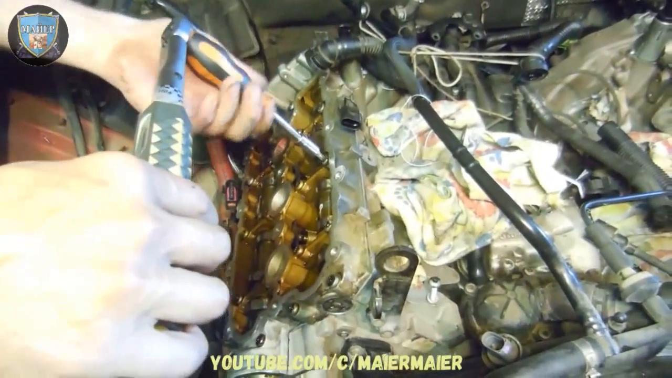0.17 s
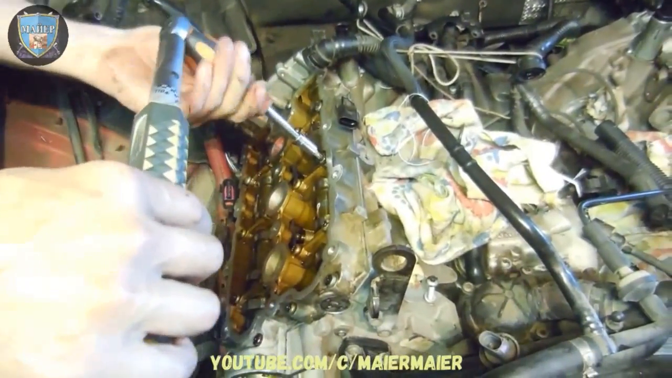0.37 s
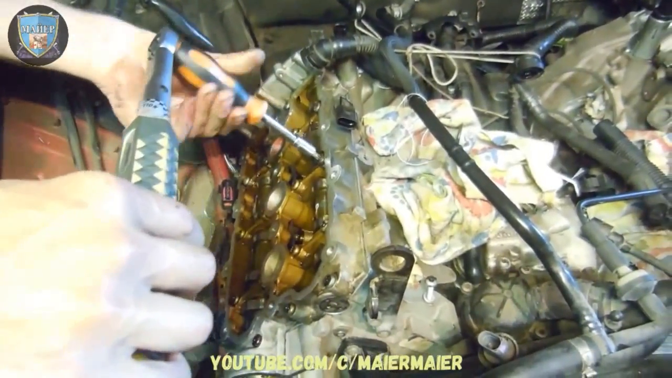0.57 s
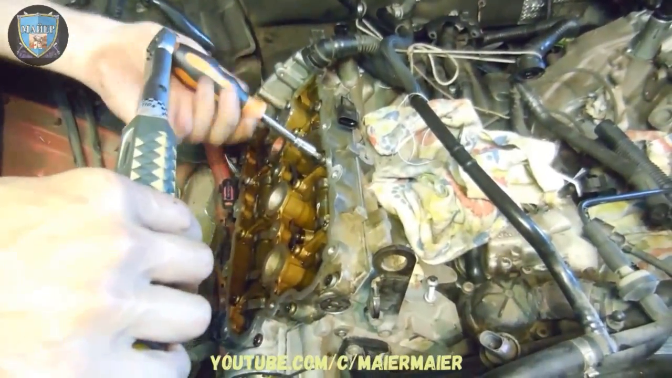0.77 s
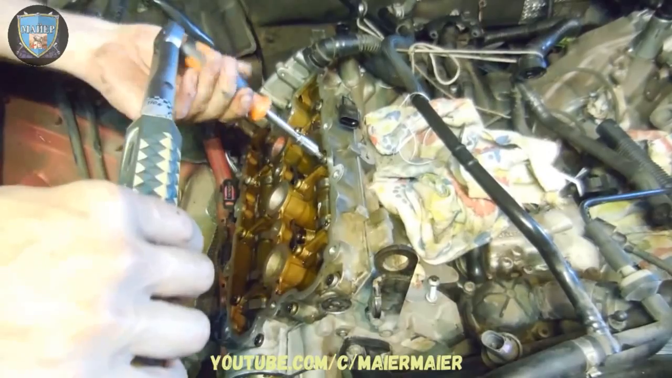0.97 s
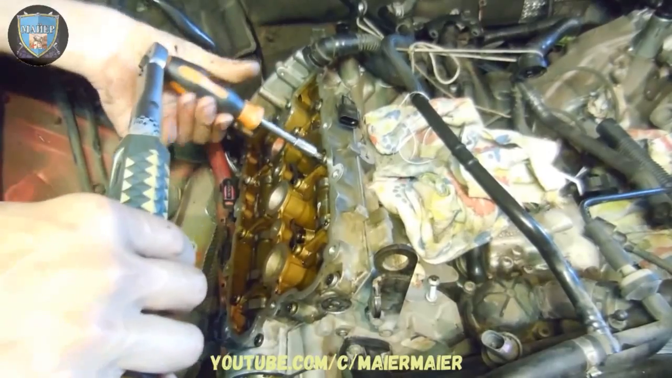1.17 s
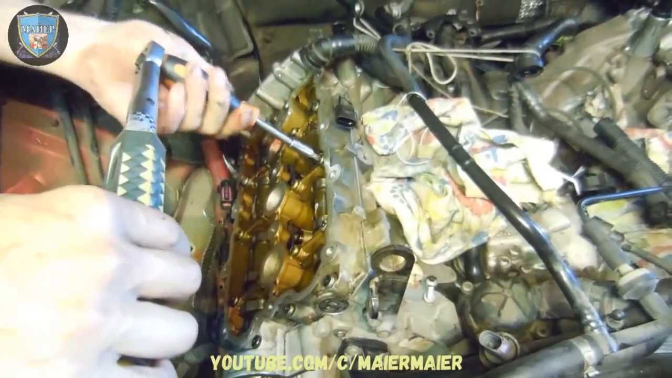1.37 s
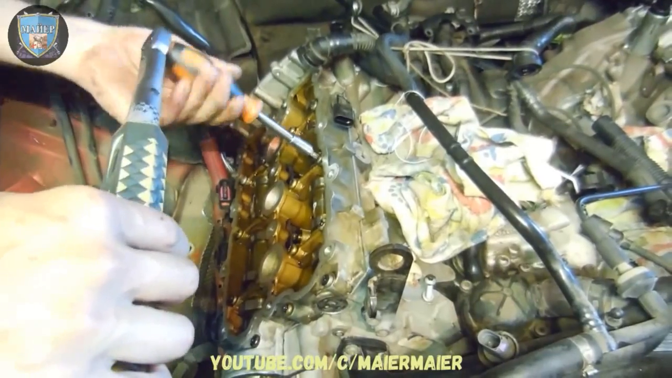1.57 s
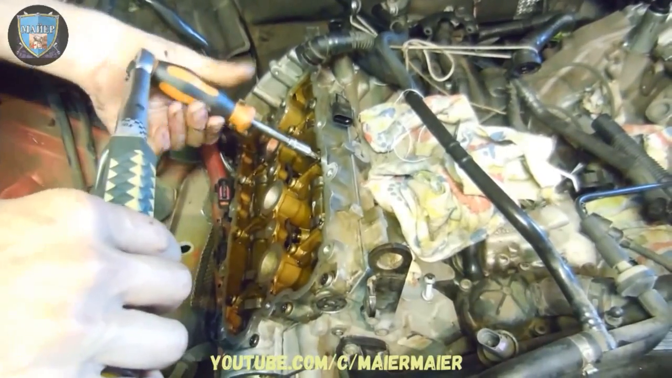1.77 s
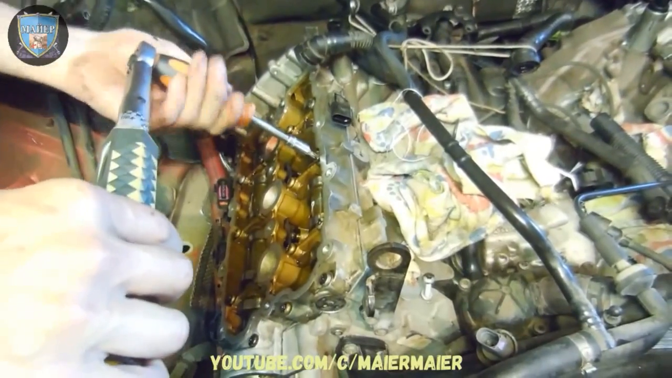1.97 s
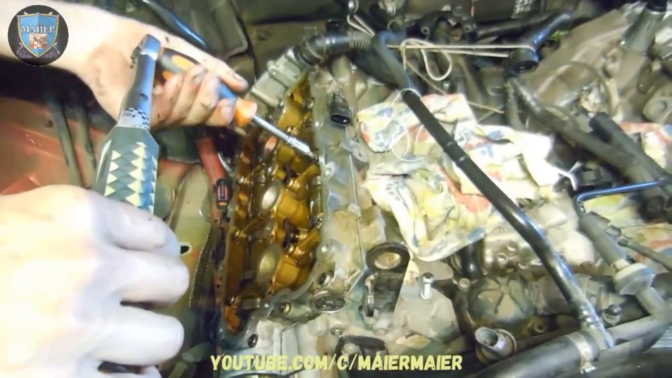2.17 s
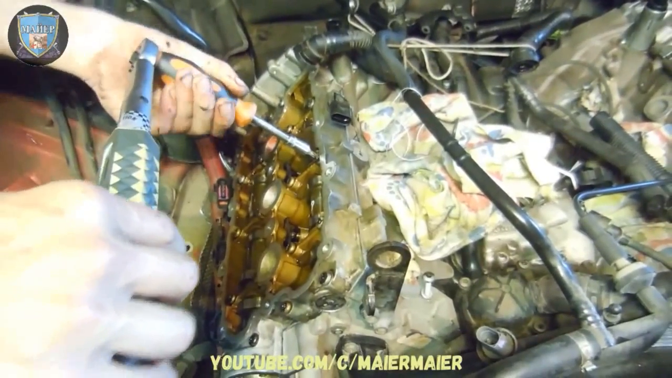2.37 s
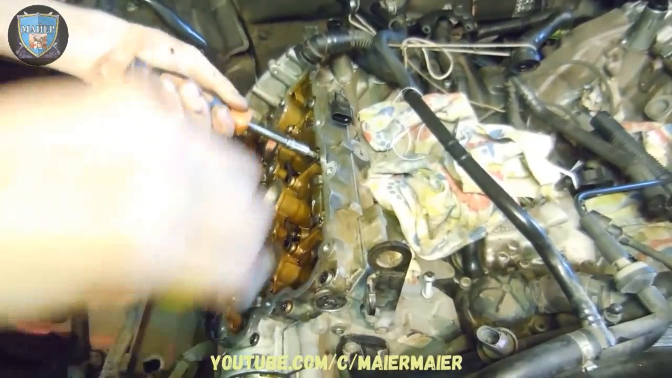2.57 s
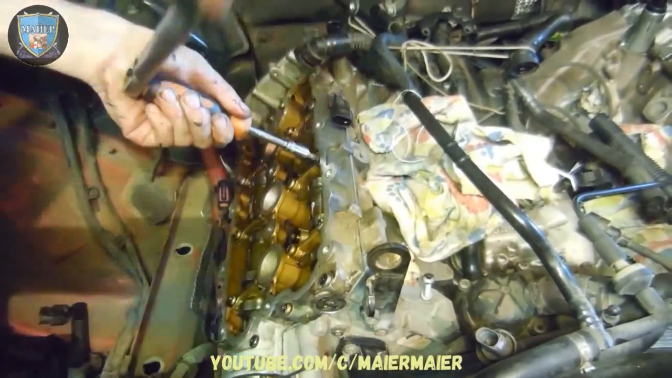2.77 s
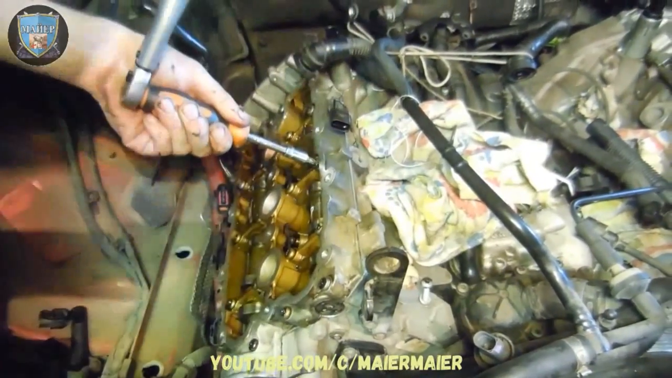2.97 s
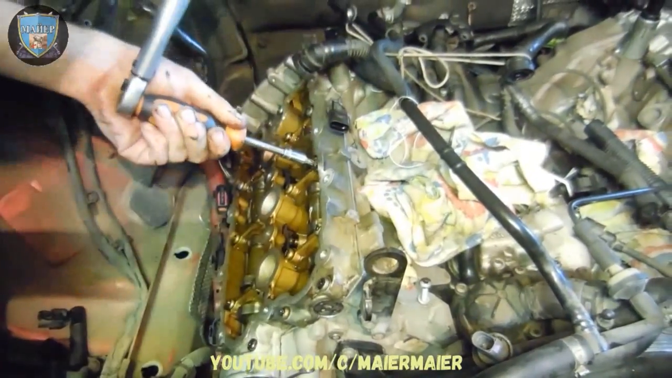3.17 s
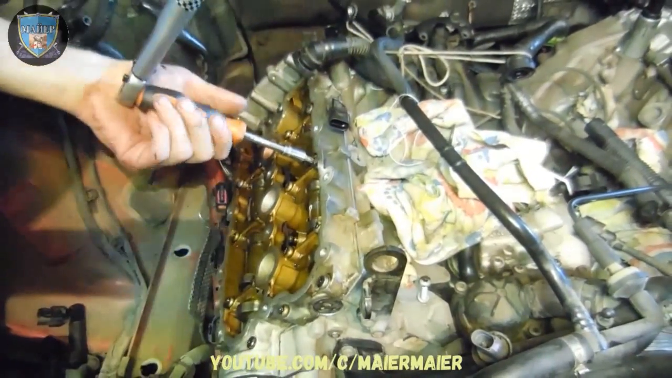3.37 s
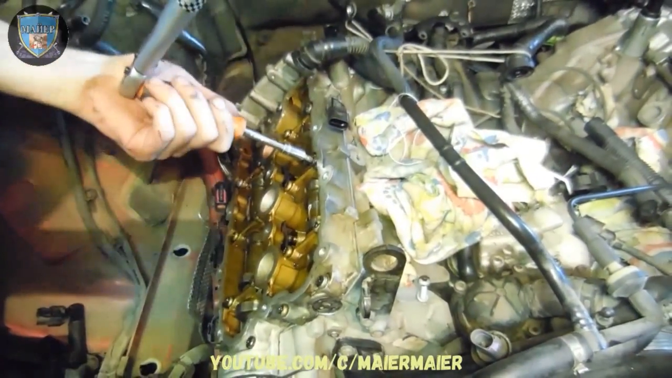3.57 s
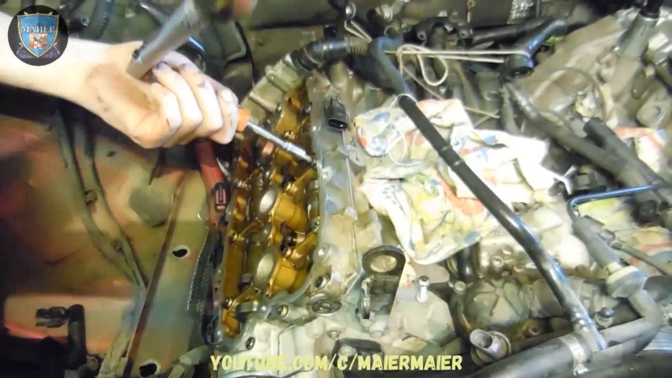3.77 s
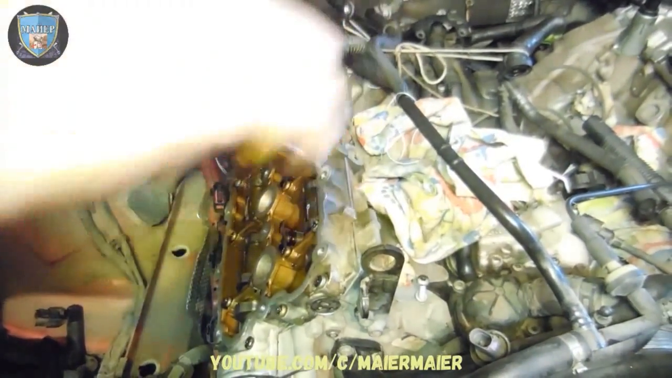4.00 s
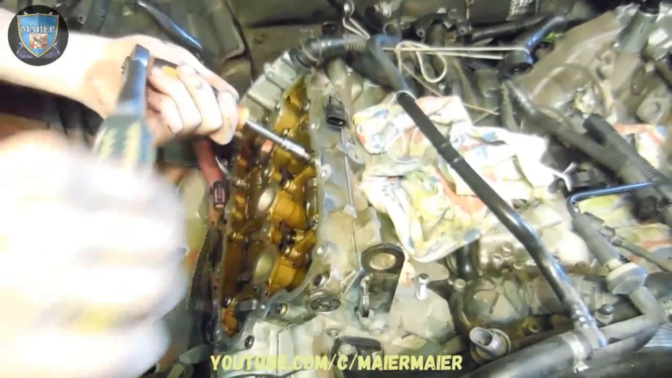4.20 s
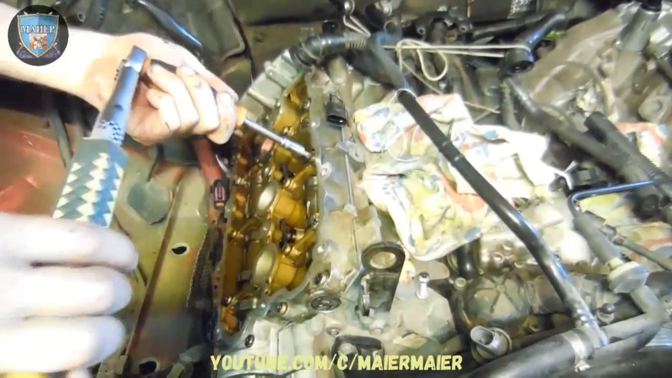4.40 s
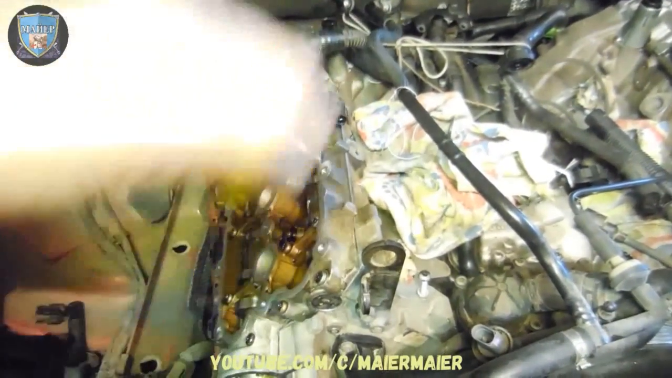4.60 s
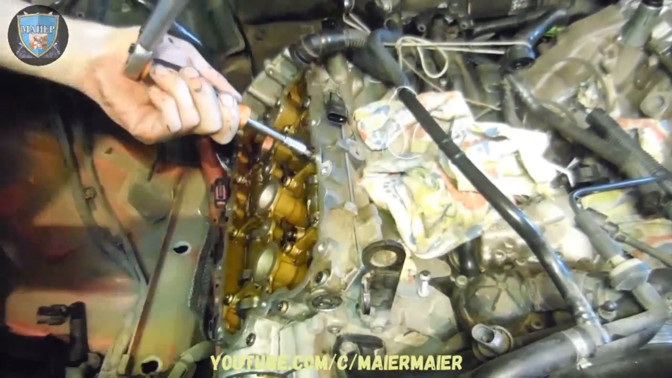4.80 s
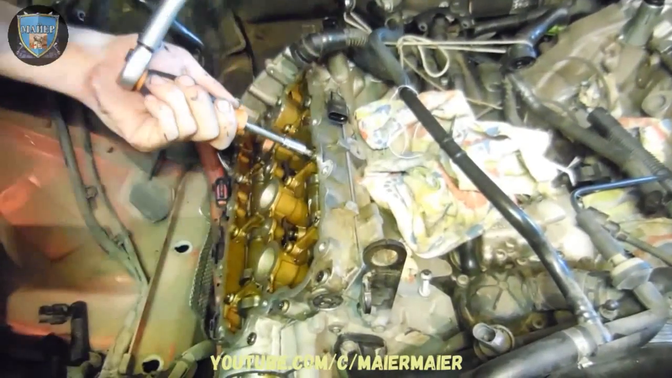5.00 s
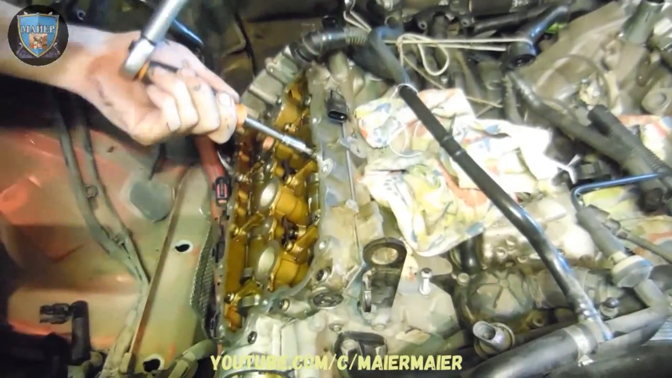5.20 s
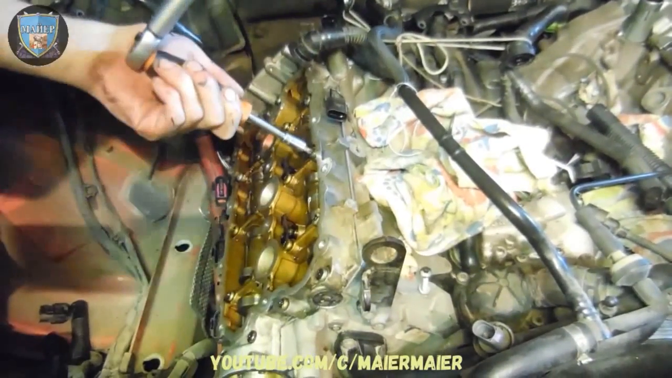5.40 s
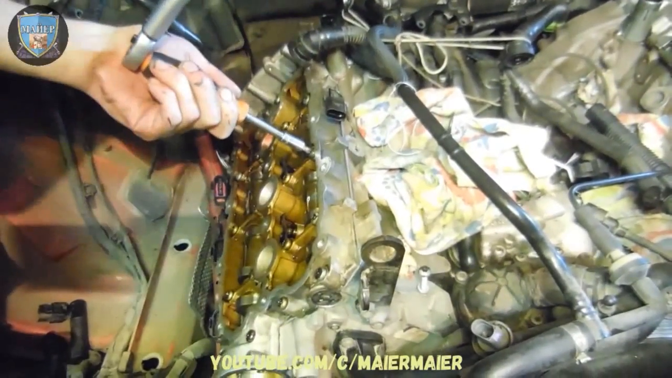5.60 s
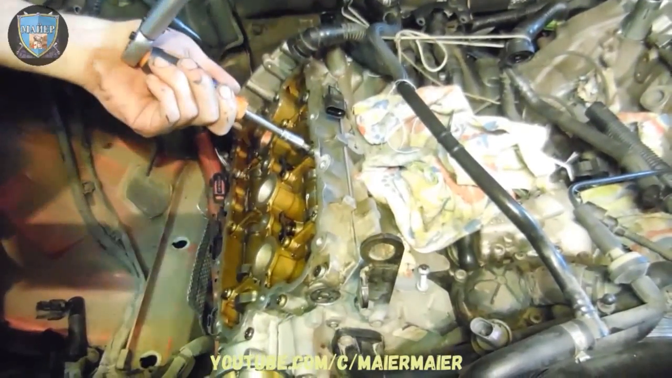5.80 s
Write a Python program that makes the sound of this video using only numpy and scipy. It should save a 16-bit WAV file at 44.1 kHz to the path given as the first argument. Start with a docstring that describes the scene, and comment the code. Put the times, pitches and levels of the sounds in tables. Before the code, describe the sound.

A hand ratchet turns an engine bolt close by, each click a sharp snap with a brief steel ring. Four quick bursts come right at the start and at about 0.5, 1.0 and 1.6 seconds, with slight scraping and socket rattle, and a dull thud under a few clicks. A faint, even ticking fills the first two gaps. At about 1.9 seconds something hollow thumps once across the room. The socket settles with small bright ticks at 2.5 seconds, then six slower clicks run until 3 seconds. A lull holds only light tool knocks and soft metal rubs. Five more slow clicks come from 4.7 to 5 seconds, followed by a ringing knock near 5.2 seconds and a few weaker bumps. The faint ticking returns around 5.6 seconds. Short workshop echoes and low, steady room noise lie under everything.

```python
"""Sharp metal clicks come in four quick runs, then two slow ones: a hand ratchet turns an engine bolt.
Each click is the pawl, a small catch, snapping over a tooth and making the steel tool ring.
Between the runs the tools knock lightly, and the small workshop adds short echoes.
Something hollow thumps once across the room, and a faint, even ticking comes and goes over room noise."""
import sys
import numpy as np
from scipy import signal
from scipy.fft import rfft, irfft
from scipy.io import wavfile
from scipy.ndimage import uniform_filter1d, minimum_filter1d

SR = 44100
rng = np.random.default_rng(int(sys.argv[2]) if len(sys.argv) > 2 else 0)


def int16_out(signal):
    """Quantize to a 16-bit WAV file."""
    q = np.round(np.clip(np.atleast_2d(signal).T, -1, 1) * 32767)
    wavfile.write(sys.argv[1], SR, q.astype(np.int16))


N = 257984
HIT_SAMPLES = 4096
HIT_HZ, HIT_TIME = np.fft.rfftfreq(HIT_SAMPLES, 1 / SR), np.arange(HIT_SAMPLES) / SR
SCENE_HZ = np.fft.rfftfreq(N, 1 / SR)
SLIP_S = .003  # the parts slip this long before they hit

# One snap of the pawl per tooth: start_s, level_db, clack_hz, clack_boost_db, ping_hz
PAWL_SNAPS = [(0.0113, 5, 1850, -11, 6170), (0.0455, 3, 4000, 4.5, 7100), (0.0863, 3, 2000, 10.5, 11600),
              (.4483, 7.5, 2970, 7, 7500), (0.4804, -4.5, 2800, 6, 5600), (0.5114, 1.5, 1870, 4, 8760),
              (0.5338, 3.5, 2300, -1, 5360), (0.5544, 7, 3250, -8, 8850), (.586, 0, 3380, 6, 6240),
              (0.6206, 3.5, 3750, 13.5, 9500), (0.6746, 6.5, 4000, 2, 6230), (.9981, 7, 3950, 5, 5700),
              (1.0303, 4, 2880, 3, 5640), (1.0573, 3.5, 4030, 5, 6240), (1.0856, 3.5, 1890, -3, 9050),
              (1.1108, 5, 2500, 1.5, 5100), (1.138, 3, 1840, 10, 8500), (1.1785, 1, 3820, 12, 6400),
              (1.2271, 6, 2100, 15.5, 9000), (1.5777, 7.5, 2510, 12, 4400), (1.608, 1, 3940, 9, 12600),
              (1.6357, 6, 4200, 5, 11700), (1.6623, 5.5, 1910, 5, 10900), (1.6817, 2.5, 3030, 7, 5770),
              (1.7015, 2.5, 2130, 13, 9200), (1.7284, 4, 2030, 10, 12100), (2.586, -1.5, 2600, 5, 4140),
              (2.681, 0.5, 2460, 8, 12400), (2.761, 7.5, 3690, 9, 6500), (2.835, 2.5, 3560, 4, 6000),
              (2.9164, 2.5, 2520, 7.5, 7000), (3.0153, 6.5, 2550, 16, 12300),
              (4.688, 2.5, 2700, 13.5, 3700), (4.747, 4, 3720, 10.5, 8000), (4.8169, 4.5, 2780, 8, 7600),
              (4.8865, 7, 2950, 7, 3740), (4.9866, 2, 2750, 10, 9600)]
# Tone of the steel head, socket and extension bar: pitch_hz, level_db
STEEL_TONE = [(30, -54), (120, -34), (300, -26), (600, -19.5), (850, -14), (1150, -8), (1600, -12),
              (2400, -5.5), (3700, -4), (4800, -3), (6500, 0.5), (9000, 0), (12000, -2), (15000, -3.5)]


def ratchet(focus, ring_db=1.36, ring_follow=0.12, ping_db=7, pan_db=-2.4):
    """The pawl drops into each tooth. Its crack varies in strength; the ring after it hardly does."""
    out, speeds = np.zeros((2, N)), handle_speed(quick_gap_s=0.075)
    pan = amp([[pan_db / 2], [-pan_db / 2]])
    for start_s, crack_db, clack_hz, clack_db, ping_hz in PAWL_SNAPS:
        speed = speeds[round(start_s * SR)]
        clunk_db, sparkle_db = -1.5 + 4 * speed, -1 + 2.5 * speed  # a quick swing adds both
        swing_tone = curve([(350, -1), (1400, clunk_db), (6000, 0), (13000, sparkle_db)], HIT_HZ)
        tone = curve(STEEL_TONE, HIT_HZ) + swing_tone
        # grip and load move two ringing pitches; focus sets how much they stand out
        clack = clack_db * resonance(HIT_HZ, clack_hz, width_hz=700)
        ping = ping_db * resonance(HIT_HZ, ping_hz, width_hz=1500)
        snap = impact(tone, focus * (clack + ping), ring_db - (1 - ring_follow) * crack_db)
        add(out, start_s - SLIP_S - .0004, amp(crack_db) * pan * snap)
    return out


def handle_speed(quick_gap_s):
    """How fast the handle swings, from 0 to 1: high where the snaps come close together."""
    snap_s, t = np.array(PAWL_SNAPS)[:, 0], np.arange(N) / SR
    last_snap = np.clip(np.searchsorted(snap_s, t) - 1, 0, len(snap_s) - 2)
    gap_s = np.diff(snap_s)[last_snap]
    speed = (t < snap_s[-1]) / (1 + (gap_s / quick_gap_s) ** 6)
    return np.maximum(uniform_filter1d(speed, size=900), 0)


def impact(tone_db, peaks_db, ring_db, crack_s=0.0045, ring_s=0.027, slip_db=-19):
    """One hit: a short slip, the crack of contact, then a ring that the hand soon damps."""
    t = np.maximum(HIT_TIME - SLIP_S, 0)
    delay_s = 3.5e-5  # the sound reaches the left microphone first
    crack_rise, ring_rise = np.minimum(t / .0005, 1) ** 2, 1 - np.exp(-(t / .0018) ** 2)
    crack = stereo_noise(HIT_SAMPLES, [(2000, 0.98), (14000, 0.44)], delay_s)
    crack = crack * fade(t, crack_s) * crack_rise
    # so brief a contact stirs all pitches nearly alike, so flatten most of the ripple
    power = np.mean(abs(rfft(crack)) ** 2, 0)
    ripple_db = 10 * np.log10(uniform_filter1d(power, size=40) + 1e-9)
    crack = shape_tone(crack, tone_db + peaks_db - 0.71 * ripple_db)
    grain = stereo_noise(HIT_SAMPLES, [(1500, 0.78), (12000, 0.72)], delay_s)
    ring = shape_tone(grain * fade(t, ring_s) * ring_rise, tone_db + .9 * peaks_db)
    slip = shape_tone(grain * (HIT_TIME < SLIP_S) * HIT_TIME, tone_db)
    return unit(crack) + amp(ring_db) * unit(ring) + amp(slip_db) * unit(slip)


def pawl_scrape(level_db=-44, roughness_db=5):
    """In a quick swing the pawl scrapes up each tooth between snaps."""
    grit = rng.standard_normal((2, N))
    grit *= amp(roughness_db * np.repeat(rng.standard_normal(N // 64 + 1), 64)[:N])
    socket = 7 * resonance(SCENE_HZ, 1350, 520)
    treble_cut = 8 * np.log2(1 + SCENE_HZ / 3000)
    scrape = shape_tone(grit, curve(STEEL_TONE, SCENE_HZ) + socket - treble_cut)
    return amp(level_db) * np.sqrt(N) * unit(scrape) * handle_speed(quick_gap_s=0.05)


def socket_rattle(level_db=-41, hits_per_s=200, spread_db=3, spots=12):
    """The loose socket chatters during quick swings; each spot it touches has its own pitch."""
    quick = handle_speed(quick_gap_s=.056) > .5
    strength = amp(spread_db * np.minimum(rng.exponential(1, N), 3))
    hits = strength * (rng.random(N) < hits_per_s / SR * quick)
    spot, out = rng.integers(0, spots, N), np.zeros((2, N))
    bass_trim = curve([(300, -11), (1000, -4)], HIT_HZ)
    tone = curve(STEEL_TONE, HIT_HZ) + bass_trim - 4 * np.log2(1 + HIT_HZ / 3000)
    for k, pitch_hz in enumerate(np.geomspace(1100, 7500, spots)):
        contact = impact(tone, 12 * resonance(HIT_HZ, pitch_hz, 750), ring_db=-2, ring_s=0.01)
        out += signal.oaconvolve((hits * (spot == k))[None], contact, axes=1)[:, :N]
    return amp(level_db) * np.sqrt(quick.sum()) * unit(out)


def low_thuds(gain_db=-1):
    """A short, dull low thud sounds under a few of the clicks."""
    # The thuds: start_s, level_db
    thuds = [(.4483, -27), (.9981, -23.5), (1.5778, -19.5), (3.0156, -20), (4.747, -18.5), (4.986, -27)]
    # Tone of the thud: pitch_hz, level_db
    thud_tone = [(20, -36), (60, -20), (130, -7.5), (300, 2.5), (600, 7), (1200, -4), (4000, -19)]
    out = np.zeros((2, N))
    thud = unit(shape_tone(signal.unit_impulse(HIT_SAMPLES), curve(thud_tone, HIT_HZ)))
    for start_s, level_db in thuds:
        add(out, start_s, amp(level_db + gain_db) * np.array([thud, thud]))
    return out


def tool_knocks(gain_db=-1):
    """The tools bump each other between strokes."""
    # The bumps: start_s, level_db, pitch_hz, treble_db_per_octave
    bumps = [(0.6614, -11.5, 1920, -24), (1.261, -6.5, 1870, -9), (1.6896, 0.5, 2470, -0.5),
             (2.074, -27.5, 3800, -8), (2.5299, -13, 4570, -10), (3.221, -19.5, 2320, -9),
             (3.261, -19.5, 2080, -20), (3.8372, -14.5, 8660, 2), (4.546, -13, 4620, -6.5),
             (4.5606, -17, 1020, -7), (4.619, -15.5, 2500, -30), (4.9775, -8.5, 4950, -6),
             (5.035, -18, 4130, -4), (5.1758, -2.5, 2630, -8.5), (5.237, -12, 2690, -24),
             (5.5517, -22, 1110, -10)]
    out = np.zeros((2, N))
    for start_s, level_db, pitch_hz, treble_slope in bumps:
        add(out, start_s - SLIP_S - .0004, amp(level_db + gain_db) * knock(pitch_hz, treble_slope))
    return out


def knock(pitch_hz, treble_slope, bar_db=-3):
    """A loose joint knocks shut: a small hit that sets the long steel bar ringing."""
    # The bar's own notes: pitch_hz, level_db, fade_s
    bar_notes = [(1030, 0, 0.05), (2500, -23, 0.28), (2690, -27, 0.24), (4340, -14, 0.082)]
    t = np.maximum(HIT_TIME - SLIP_S, 0)
    tone = curve([(30, -42), (120, -26), (500, -2), (1200, 5.5), (2500, 15.5)], HIT_HZ)
    tone += treble_slope * np.log2(np.maximum(HIT_HZ / 3800, 1))
    hit = unit(impact(tone, 14 * resonance(HIT_HZ, pitch_hz, 420), ring_db=-3))
    window = (t > 0) * (1 - (HIT_TIME / HIT_TIME[-1]) ** 4)
    for note_hz, note_db, fade_s in bar_notes:
        wave = np.sin(2 * np.pi * (note_hz * t + 0.6 * rng.random((2, 1))))
        response = np.sqrt(resonance(note_hz, pitch_hz, 700))  # strongest near the knock's pitch
        hit += amp(note_db + bar_db) * response * unit(wave * fade(t, fade_s) * window)
    return hit


def socket_settling(start_s=2.53, end_s=2.572, level_db=-18, low_hz=3700, high_hz=5300, count=5):
    """The socket settles into place with a few bright ticks before the first slow stroke."""
    out = np.zeros((2, N))
    for k, (when, pitch) in enumerate(rng.random((count, 2))):
        tick_s = start_s + (end_s - start_s) * (k + when) / count
        tick = knock(low_hz + pitch * (high_hz - low_hz), treble_slope=2.5)
        add(out, tick_s - SLIP_S, amp(level_db) * tick)
    return out


def grip_rubs(roughness_db=5):
    """Steel rubs lightly on steel while the hands change their grip."""
    # The rubs: start_s, end_s, level_db
    rubs = [(2.49, 2.576, -53.5), (3.17, 3.336, -58.5), (4.54, 4.702, -55), (5.18, 5.401, -57)]
    out = np.zeros((2, N))
    for start_s, end_s, level_db in rubs:
        size = 128 * round((end_s - start_s) * SR / 128)
        grit = stereo_noise(size, [(1000, .6), (8000, .2)])
        grit *= amp(roughness_db * np.repeat(rng.standard_normal(size // 128), 128))
        tone = curve([(50, -55), (200, -9.5), (1000, -2), (1700, -7.5), (2600, 5.5), (3400, -26),
                      (4400, -7), (14000, -18)], np.fft.rfftfreq(size, 1 / SR))
        rub = shape_tone(grit, tone) * signal.windows.tukey(size, .3)
        add(out, start_s, amp(level_db) * np.sqrt(size) * unit(rub))
    return out


def far_thump(start_s=1.881, level_db=-1.5, swell_s=0.012, size=32768):
    """A distant blow on something hollow, heard mostly through the room's echoes."""
    # Tone of the blow: pitch_hz, level_db
    blow_tone = [(59, -60), (100, -27), (368, -14), (416, -4.5), (568, -10), (604, -2), (841, -13.5),
                 (895, 2), (972, -7), (1220, 2.5), (1500, -8.5), (2620, -10.5), (3290, -17.5),
                 (4980, -16.5), (14000, -25)]
    # The hollow thing's own notes: pitch_hz, half_width_hz, weight_db
    hollow_notes = [(613, 26, -1.5), (930, 27, -4), (1110, 120, -21), (1880, 48, -2), (2740, 73, 2)]
    # How alike the two ears hear it: pitch_hz, likeness
    likeness = [(60, 0.79), (130, 0.91), (290, 0.94), (640, 0.85), (1410, 0.62), (3100, 0.21),
                (6820, -0.16), (15000, -0.08)]
    band_hz, t, bands = signal.stft(stereo_noise(size, likeness), SR, nperseg=256)
    fade_s = curve([(600, 0.47), (5000, 0.3)], band_hz)[:, None]
    tail = signal.istft(bands * fade(t, fade_s), SR, nperseg=256)[1][:, :size]
    tail *= 1 - 0.49 * np.exp(-np.arange(size) / SR / swell_s)
    hz = np.fft.rfftfreq(size, 1 / SR)
    peaks = sum(amp(db) * resonance(hz, pitch, 2 * half_width) for pitch, half_width, db in hollow_notes)
    blow = unit(shape_tone(tail, curve(blow_tone, hz) + 5 * peaks))
    out = np.zeros((2, N))
    add(out, start_s, amp(level_db) * amp([[.8], [-.8]]) * blow)
    return out


def faint_ticking(pitch_hz=1165, gap_s=.0672, gain_db=1, spread_db=1.2):
    """A soft, dull, even ticking, about fifteen to the second."""
    # Runs of ticks: start_s, end_s, level_db
    runs = [(0.108, .35, -25), (0.711, .94, -25), (5.616, 5.84, -28)]
    out = np.zeros((2, N))
    tone = curve([(60, -36), (200, -11), (1200, 5), (3000, 4.5), (10000, -26)], HIT_HZ)
    tone += 19 * resonance(HIT_HZ, pitch_hz, 160)
    for start_s, end_s, level_db in runs:
        for tick_s in np.arange(start_s, end_s, gap_s):
            tick = unit(impact(tone, peaks_db=0, ring_db=6, ring_s=.04))
            add(out, tick_s - SLIP_S, amp(level_db + gain_db + rng.normal(0, spread_db)) * tick)
    return out


def workshop_echoes(sound, first_echo_s=0.0011):
    """Dense echoes from the engine bay and the walls; the low notes last longest."""
    # How long the echoes last: pitch_hz, fade_s
    echo_fades = [(300, 0.46), (1200, 0.17), (3000, 0.22), (7000, 0.22), (14000, 0.15)]
    # Echo strength against the direct sound: pitch_hz, level_db
    echo_levels = [(300, -8), (1200, -5), (3000, -8), (7000, -13.5), (14000, -12.5)]
    noise = stereo_noise(SR // 2, [(300, 0.22), (1200, 1.0), (3000, 0.23), (8000, 0.026)])
    band_hz, t, bands = signal.stft(noise, SR, nperseg=256)
    fade_s = curve(echo_fades, band_hz)[:, None]
    equal_energy = np.sqrt(2 * np.log(1000) / (fade_s * SR))
    bands = bands * fade(t, fade_s) * amp(curve(echo_levels, band_hz))[:, None] * equal_energy
    tail = signal.istft(bands, SR, nperseg=256)[1]
    tail *= np.clip(np.arange(tail.shape[1]) / SR / first_echo_s - 1, 0, 1)
    return signal.fftconvolve(sound, tail, axes=1)[:, :N]


def room_noise(level_db=-53.5):
    """Steady room noise and microphone hiss."""
    # Tone of the noise: pitch_hz, level_db
    noise_tone = [(15, -23), (25, -19.5), (161, -11.5), (190, -6), (217, -11), (263, -3), (463, -4.5),
                  (575, -2.5), (796, 0), (936, -2.5), (1230, -1.5), (3160, -5), (5430, -8), (14800, -17),
                  (16000, -21)]
    # How alike the two ears hear it: pitch_hz, likeness
    likeness = [(60, 0.36), (130, 0.44), (290, 0.4), (640, 0.31), (1410, 0.049), (3100, -0.019),
                (6820, 0.074), (15000, -0.12)]
    hiss = shape_tone(stereo_noise(N, likeness), curve(noise_tone, SCENE_HZ))
    return amp(level_db) * np.sqrt(N) * unit(hiss)


def amp(db):
    """Turns decibels into a gain."""
    return 10 ** (np.asarray(db) / 20)


def unit(sound):
    """Scales each channel to an energy of 1."""
    return sound / np.sqrt(np.sum(sound ** 2, -1, keepdims=True) + 1e-20)


def curve(points, hz):
    """Joins (pitch_hz, value) points with lines, giving each octave about equal room."""
    pitch_hz, value = np.transpose(points)
    return np.interp(np.log(hz + 1), np.log(pitch_hz + 1), value)


def resonance(hz, centre_hz, width_hz):
    """A hill of height 1 around the pitch at which something rings."""
    return 1 / (1 + (2 * (hz - centre_hz) / width_hz) ** 2)


def fade(t, fade_s):
    """Dies away by 60 dB in fade_s seconds."""
    return np.exp(-np.log(1000) * t / fade_s)


def add(mix, start_s, sound):
    """Adds a stereo sound to the mix at start_s."""
    part = mix[:, max(round(start_s * SR), 0):][:, :sound.shape[1]]
    part += sound[:, :part.shape[1]]


def shape_tone(sound, tone_db):
    """Turns each pitch up or down, so that any ringing comes after the hit."""
    log_gain = np.log(amp(tone_db))
    phase = -signal.hilbert(np.r_[log_gain, log_gain[-2:0:-1]]).imag[:len(tone_db)]
    return irfft(rfft(sound) * np.exp(log_gain + 1j * phase))


def stereo_noise(size, likeness, delay_s=0):
    """Left and right white noise, partly alike (1 = the same), the right one delay_s late."""
    hz = np.fft.rfftfreq(size, 1 / SR)
    left, other = rfft(rng.standard_normal((2, size)))
    alike = np.clip(curve(likeness, hz), -1, 1)
    right = alike * left * np.exp(-2j * np.pi * hz * delay_s) + np.sqrt(1 - alike ** 2) * other
    return irfft([left, right], size)


def scene():
    """The tools and their echoes over the sounds of the room."""
    # How much louder the direct sound is on the left: pitch_hz, left_minus_right_db
    balance = [(300, 8.5), (1200, 3.5), (2200, 0.5), (4500, 1.5), (8000, 1), (13000, -2)]
    small_sounds = (pawl_scrape() + socket_rattle() + low_thuds() + tool_knocks()
                    + socket_settling() + grip_rubs() + faint_ticking())
    left, right = ratchet(focus=1) + small_sounds
    side_db = curve(balance, SCENE_HZ) / 2
    direct = np.array([shape_tone(left, side_db), shape_tone(right, -side_db)])
    # the ringing pitches leave in narrow beams; the room gathers all directions and evens them out
    echoes = workshop_echoes(ratchet(focus=.4) + small_sounds)
    return direct + echoes + far_thump() + room_noise()


def record(dry, ceiling=.9, top_hz=15950):
    """A quick limiter holds down the loudest peaks, then the highest treble is cut off."""
    allowed = ceiling / np.maximum(abs(dry).max(0), ceiling)
    gain = uniform_filter1d(minimum_filter1d(allowed, size=17), size=17)
    low_pass = signal.firwin(255, top_hz, window=("kaiser", 8), fs=SR)
    return signal.oaconvolve(dry * gain, low_pass[None], "same", axes=1)


dry = scene()
out = record(dry)
int16_out(out)
```